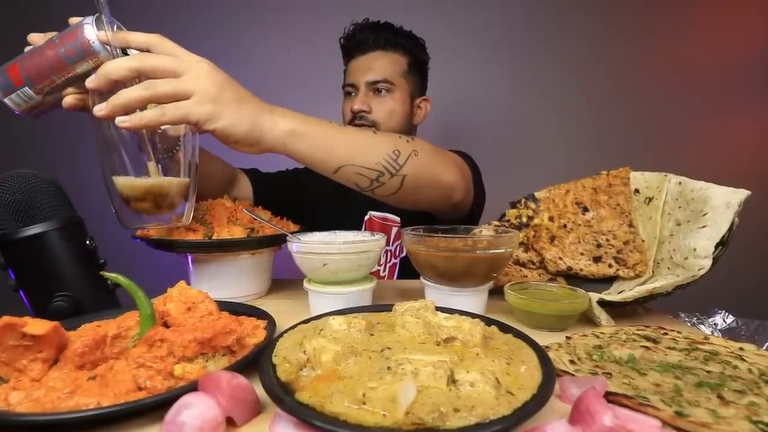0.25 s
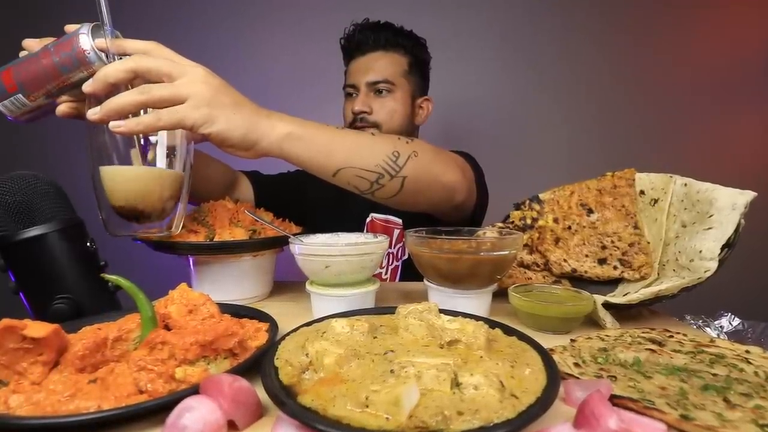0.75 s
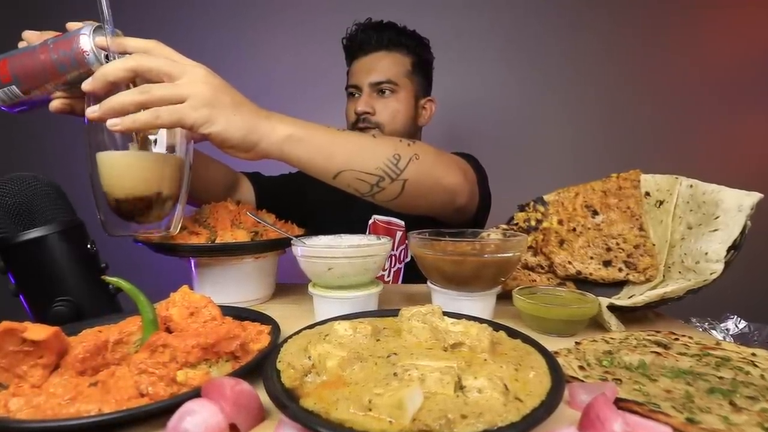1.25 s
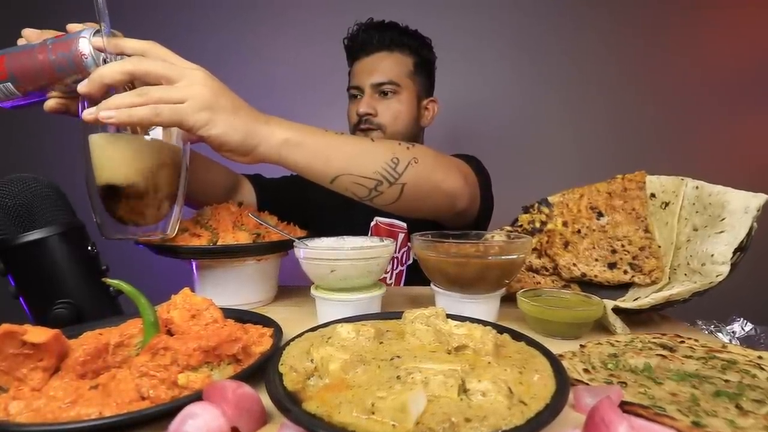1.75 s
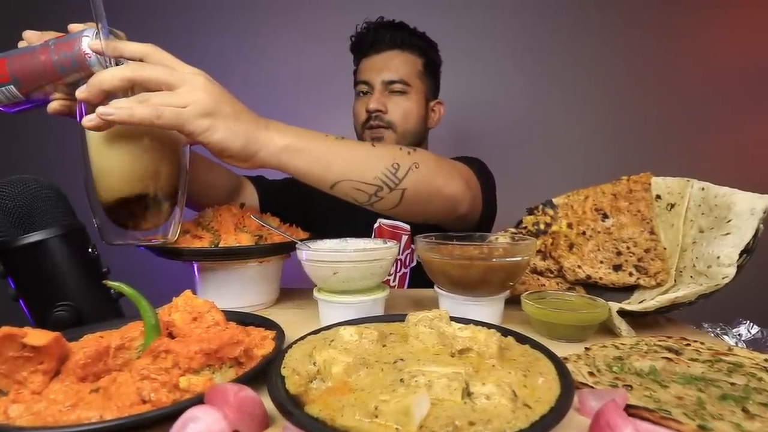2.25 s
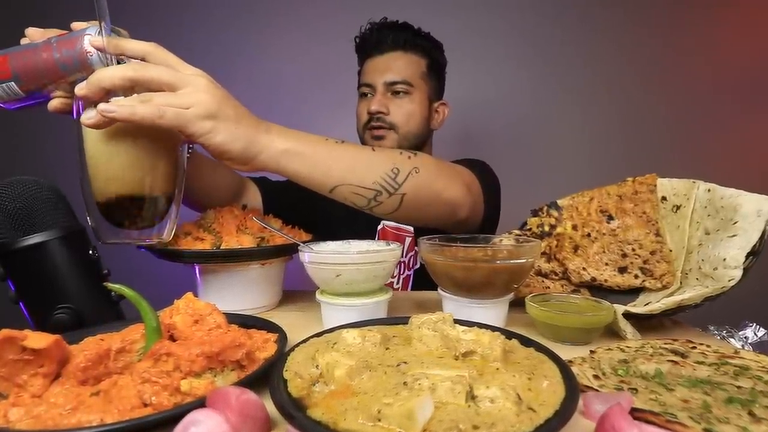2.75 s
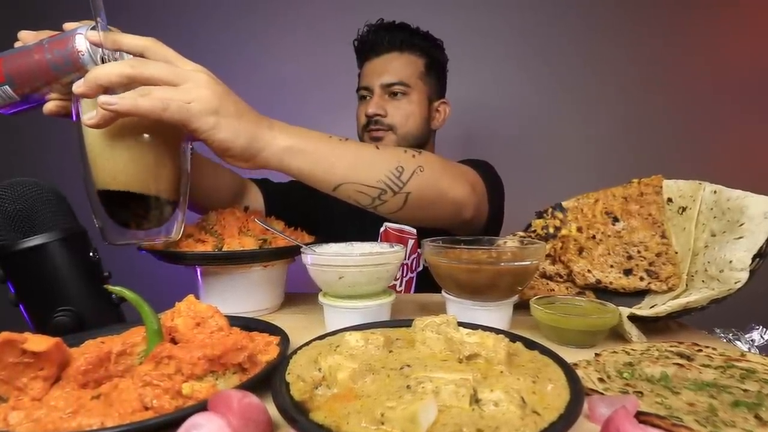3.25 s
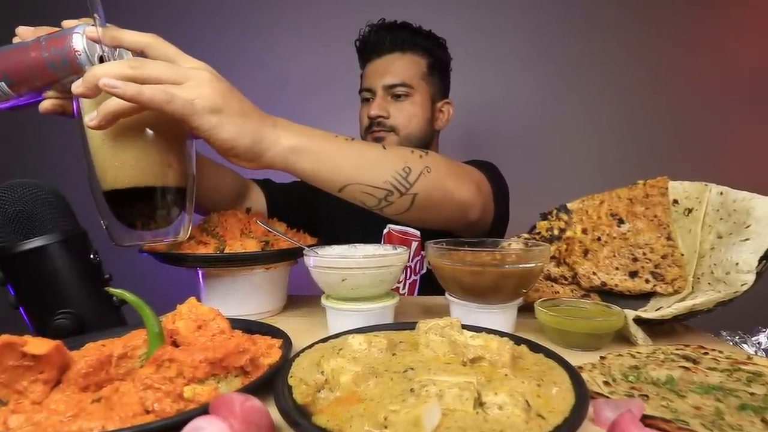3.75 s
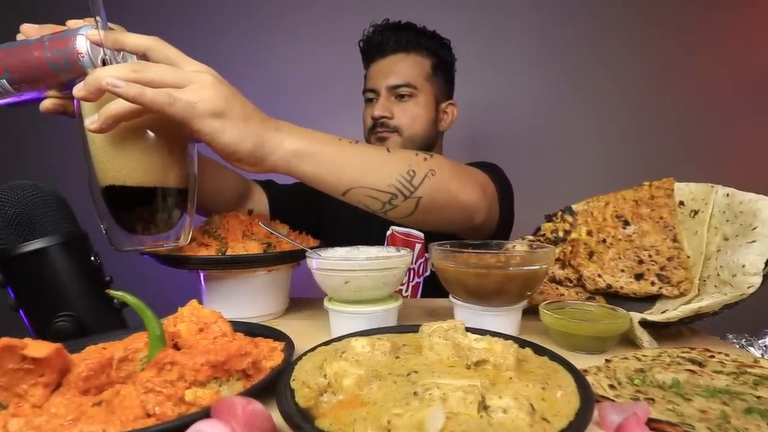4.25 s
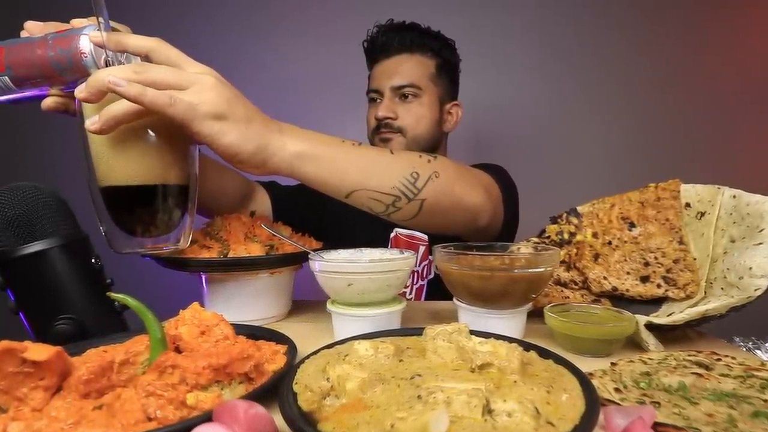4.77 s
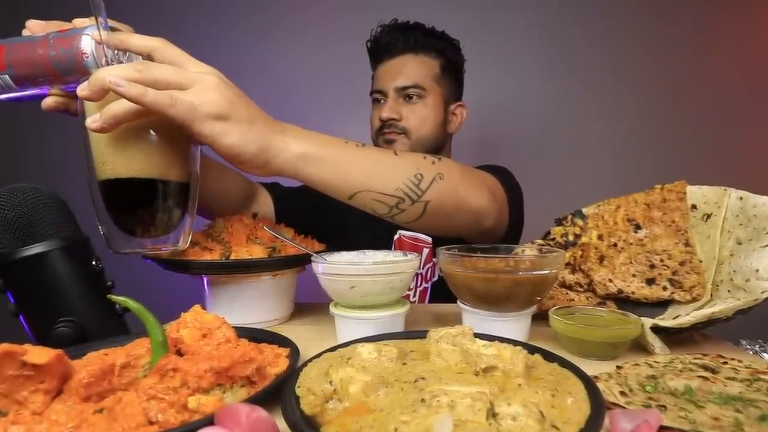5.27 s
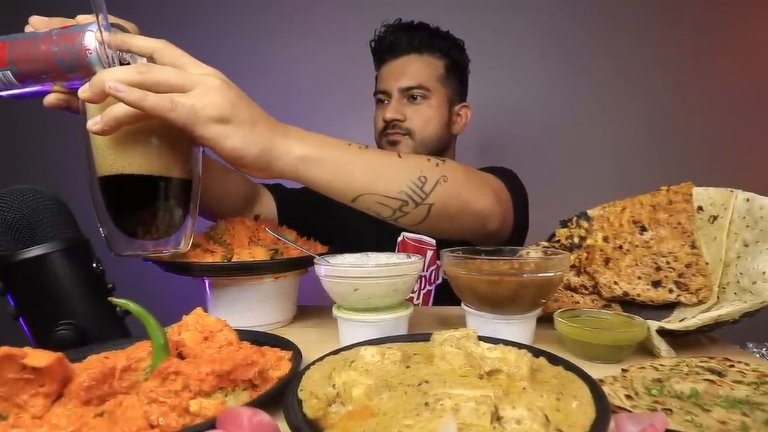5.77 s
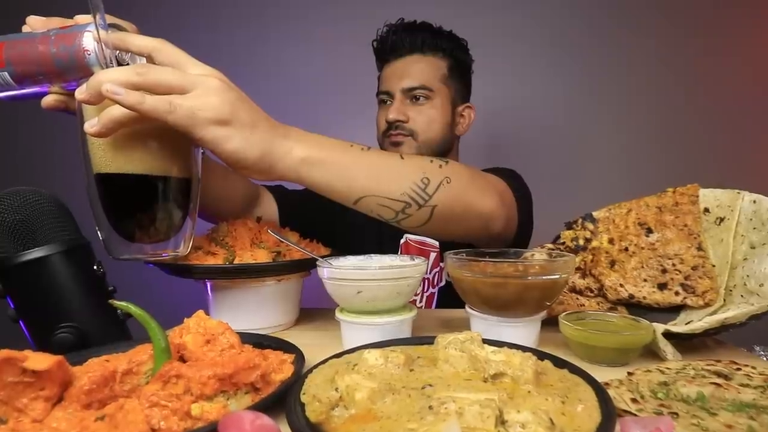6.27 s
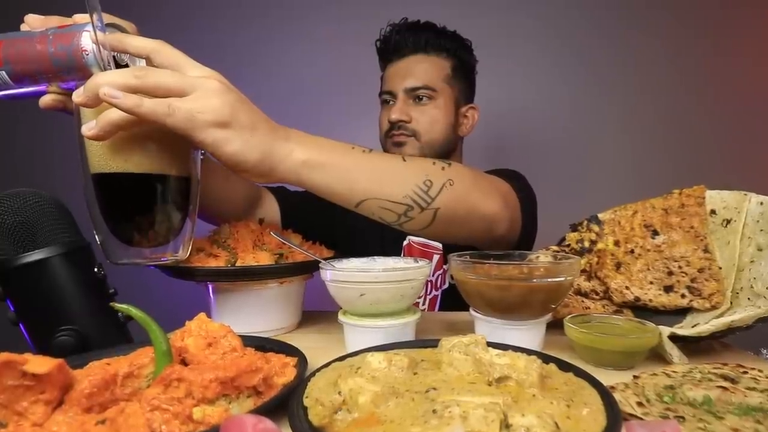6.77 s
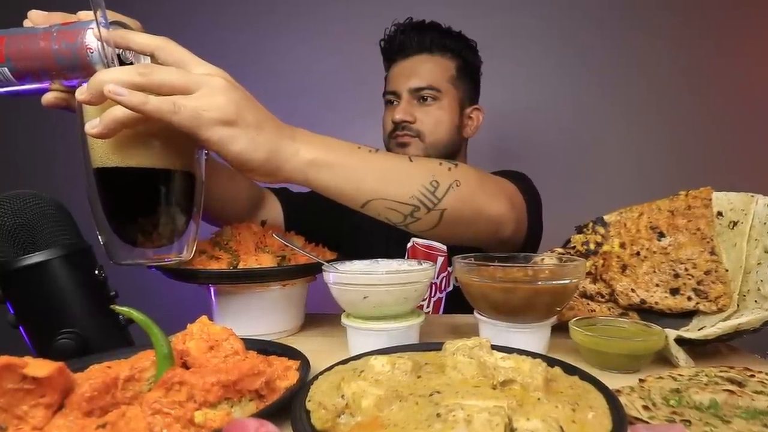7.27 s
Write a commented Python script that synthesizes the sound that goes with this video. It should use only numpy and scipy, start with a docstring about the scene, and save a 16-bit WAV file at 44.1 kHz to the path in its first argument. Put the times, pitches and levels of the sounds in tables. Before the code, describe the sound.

Soda pours from a can into a tall glass, early gurgling splashes and a sharp metallic snap giving way to steady bright fizz.

```python
"""Soda is poured from a can into a tall glass: splashes push air and ring the nearly empty glass.
The can snaps early, its edge then ticks on the rim: struck modes with a brief noisy crack.
Foam, random bubble clicks through filters, hisses throughout; its air column shortens and rises in pitch.
Single bubbles pop as clicks with short rings; a knock sets the microphone stand swinging.
Late on, the can snaps, squeaks on the glass by stick-slip, then ticks on the rim. Room noise hums underneath."""
import sys
import numpy as np
from scipy import signal
from scipy.fft import rfft, irfft, next_fast_len
from scipy.io import wavfile
from scipy.ndimage import uniform_filter1d, map_coordinates

SR = 44100
rng = np.random.default_rng(int(sys.argv[2]) if len(sys.argv) > 2 else 0)


def dump(signal):
    """Clip the signal to [-1, 1] and save it as 16-bit WAV at the path in sys.argv[1]."""
    limited = np.clip(np.atleast_2d(signal).T, -1, 1)
    pcm = np.round(limited * 32767).astype(np.int16)
    wavfile.write(sys.argv[1], SR, pcm)


def gain_from_db(level_db):
    """Turn a decibel level (scalar or array-like) into a linear amplitude factor."""
    decades = np.asarray(level_db, float) / 20
    return 10 ** decades


N = 331781


def unit(x):
    """Scaled to rms 1."""
    return x / np.sqrt(np.mean(x ** 2) + 1e-20)


def along(points, hz):
    """(Hz, value) points read on a log frequency axis."""
    point_hz, value = np.transpose(points)
    return np.interp(np.log(hz + 1), np.log(point_hz + 1), value)


def curves(rows, t):
    """Each column after the time, read at times t."""
    s, *columns = np.transpose(rows)
    return [np.interp(t, s, column) for column in columns]


def wobble(rate_hz):
    """A smooth random curve, rate_hz knots a second."""
    knots = rng.standard_normal(int(N * rate_hz / SR) + 4)
    return map_coordinates(knots, [np.arange(N) * rate_hz / SR])


def filtered(x, response):
    """x times a complex response of frequency."""
    m = next_fast_len(N + 8192)
    return irfft(rfft(x, m) * response(np.fft.rfftfreq(m, 1 / SR)), m)[:N]


def shaped_noise(x, spectrum_db):
    """x filtered to a (Hz, dB) spectrum, at rms 1."""
    return unit(filtered(x, lambda f: gain_from_db(along(spectrum_db, f))))


def peak(hz, centre_hz, width_hz):
    """A causal resonance of top gain 1."""
    return 1j * hz * width_hz / (centre_hz ** 2 - hz ** 2 + 1j * hz * width_hz)


def add(track, s, sound):
    """Mixes a sound into the track from time s."""
    part = track[max(round(s * SR), 0):][:len(sound)]
    part += sound[:len(part)]


def bursts(per_second, spread_db, share):
    """Tiny bubble clicks of uneven size over the blur of countless smaller ones."""
    chance, size = rng.random((2, N))
    strength = gain_from_db(-spread_db * np.log(size + 0.022)) * rng.standard_normal(N)
    clicks = (chance < per_second / SR) * strength
    return np.sqrt(share) * unit(clicks) + np.sqrt(1 - share) * rng.standard_normal(N)


# Foam fizz: time_s, fizz_db
FOAM_LEVEL = [(0, -50.5), (.3, -48.5), (.55, -46), (1.95, -45.5), (2.4, -44.5), (4.2, -42.5), (6.2, -42),
              (7.52, -43)]
# The colour of the full glass takes over: middle, time scale, share before
FULL_AT_S, FULL_OVER_S, FULL_AT_FIRST = 2.84, 0.19, 0.3


def foam():
    """Bursting bubbles fizz through a filling glass and sound the air above them."""
    t = np.arange(N) / SR
    fizz_db, = curves(FOAM_LEVEL, t)
    takeover = 1 / (1 + np.exp((FULL_AT_S - t) / FULL_OVER_S))
    filled = FULL_AT_FIRST + (1 - FULL_AT_FIRST) * takeover
    return glass_fizz(fizz_db, filled) + small_bubbles(t, fizz_db) + air_column(t, fizz_db, filled)


# Fizz out of a deep and a full glass: freq_hz, density_db (per Hz, relative)
DEEP_SPECTRUM = [(200, -44), (400, -16), (1000, 5), (1800, -7.5), (3000, -3.5), (4400, -4), (6000, -1.5),
                 (8000, -2.5), (8800, -6.5), (11000, -28), (16000, -45)]
FULL_SPECTRUM = [(200, -41), (400, -8.5), (1000, -1.5), (2200, -3), (4200, -6), (6000, -4), (7800, -7.5),
                 (8800, -12.5), (11000, -29), (16000, -45)]
# Cross resonances of the deep and the full glass: freq_hz, width_hz, boost_db
DEEP_RESONANCES = [(2390, 110, 9.5), (3520, 180, 1), (5540, 190, 2.5), (6360, 400, 2.5)]
FULL_RESONANCES = [(1037, 100, 3.1), (1911, 55, 7.1), (2340, 140, 4.9), (2640, 530, 3.7), (3470, 650, 1.8),
                   (5440, 170, 2.9), (6730, 1500, 3.1)]


def glass_fizz(fizz_db, filled):
    """The glass colours the fizz; the deep colour crossfades to the full one."""
    def colour(spectrum, resonances):
        def response(f):
            boost_db = sum(db * abs(peak(f, hz, width_hz)) ** 2 for hz, width_hz, db in resonances)
            return gain_from_db(along(spectrum, f) + boost_db)
        return response

    deep = unit(filtered(bursts(2500, 7.3, 0.28), colour(DEEP_SPECTRUM, DEEP_RESONANCES)))
    full = unit(filtered(bursts(2500, 2.2, 0.37), colour(FULL_SPECTRUM, FULL_RESONANCES)))
    mix = np.sqrt(1 - filled) * deep + np.sqrt(filled) * full
    return gain_from_db(fizz_db + 0.52 * wobble(8.3)) * mix


# Small and finest bubbles: freq_hz, density_db (per Hz, relative)
SMALL_SPECTRUM = [(7000, -37), (8500, -1), (9500, 2), (10600, -1), (11500, -9.5), (13000, -28)]
FINEST_SPECTRUM = [(9000, -26), (11500, -1.5), (13200, 2.5), (14500, -0.5), (15700, -3.5)]
# Brightness over the fizz: time_s, small_db, finest_db, sizzle_db (band near 7.5 kHz)
BRIGHTNESS = [(0, -15, -16, -14), (.5, -12.5, -15, -13), (.95, -15.5, -13, -9.5), (1.75, -13, -9.5, -14),
              (2.1, -14.5, -9.5, -6), (2.6, -11, -13.5, -9), (2.95, -15.5, -12.5, -12),
              (3.3, -17, -13.5, -9.5), (4.4, -14.5, -14, -13), (5.6, -14.5, -15, -13),
              (7.52, -17, -16.5, -23)]


def small_bubbles(t, fizz_db):
    """Smaller bubbles add three treble bands, each with its own level curve."""
    small_db, finest_db, sizzle_db = curves(BRIGHTNESS, t)
    finest = shaped_noise(bursts(3000, 2.8, 0.3), FINEST_SPECTRUM)
    small = shaped_noise(bursts(3000, 4.2, 0.48), SMALL_SPECTRUM)
    sizzle = unit(filtered(bursts(3000, 3, 0.39), lambda f: abs(peak(f, 7560, 1600)) ** 2))
    finest = finest * gain_from_db(fizz_db + finest_db + 0.6 * wobble(7))
    small = small * gain_from_db(fizz_db + small_db + 0.6 * wobble(8.8))
    sizzle = sizzle * gain_from_db(fizz_db + sizzle_db + 0.55 * wobble(6))
    return finest + small + sizzle


# Air over the liquid, a quarter-wave tube: time_s, length_m, level_db
AIR_COLUMN = [(0, 0.12, -46), (.35, 0.12, -50.5), (.65, 0.11, -59), (1.1, 0.1, -52.5), (1.9, 0.073, -46),
              (2.3, 0.064, -47), (2.7, 0.061, -44.5), (3.3, 0.062, -48), (5.5, 0.061, -52.5),
              (7.52, 0.06, -50.5)]
SOUND_M_PER_S = 343
# Pitch over width; a sloshing, rising surface widens the resonance by SMEAR_S of its glide
SHARPNESS, SMEAR_S = 5.1, 0.34
# Cross resonance over the fizz: grows as foam covers the bottom, fades as the glass fills
CROSS_DB, CROSS_RISE_S = -4, 0.14
# Higher resonance of the nearly empty glass, over the fizz, fading as it fills
UPPER_DB, UPPER_FADE_S = -11, 1


def air_column(t, fizz_db, filled):
    """Bubble bursts excite a gliding quarter-wave resonance and two fixed ones."""
    hz, frame_s, spectrum = signal.stft(bursts(800, 3.0, 0.13), SR, nperseg=512)
    hz = hz[:, None]
    length_m, column_db = curves(AIR_COLUMN, frame_s)
    pitch_hz = SOUND_M_PER_S / (4 * length_m)
    glide_hz_per_s = uniform_filter1d(np.gradient(pitch_hz, frame_s), size=60)
    width_hz = pitch_hz / SHARPNESS + SMEAR_S * abs(glide_hz_per_s)

    def rms_one(gain):
        return gain / np.sqrt(np.mean(gain ** 2, axis=0))

    tube = gain_from_db(column_db) * rms_one(abs(peak(hz, pitch_hz, width_hz)) ** 1.5)
    covered = 1 - np.exp(-(t + 0.05) / CROSS_RISE_S)
    cross_gain = gain_from_db(fizz_db + CROSS_DB) * (1 - filled) * covered
    cross = np.interp(frame_s, t, cross_gain) * rms_one(abs(peak(hz, 2760, 330)) ** 1.8)
    upper_gain = gain_from_db(fizz_db + UPPER_DB) * np.exp(-t / UPPER_FADE_S)
    upper = np.interp(frame_s, t, upper_gain) * rms_one(abs(peak(hz, 3630, 150)) ** 1.5)
    sound = signal.istft(spectrum * (tube + cross + upper), SR, nperseg=512)[1][:N]
    return sound * gain_from_db(0.28 * wobble(9.3))


# Liquid slaps the bottom or the pool: start_s, push_peak_db, rise_ms (0.01 ms is added)
SPLASH_EVENTS = [(0, -14, 0.25), (.0155, -22, 0.17), (.027, -25, .25), (.0905, -31, 0.15),
                 (.0995, -28, .21), (.1322, -12, 0.32), (.1555, -24, .2), (.159, -23, .2),
                 (.1727, -25, 0.15), (.1878, -19, 0.13), (0.2227, -11, 0.15), (0.2373, -21, .15),
                 (.243, -23, 0.12), (.269, -24, .2), (.286, -20, 0.076), (.327, -26, 0.3),
                 (0.3313, -25.5, 0.17), (.716, -18.5, 0.063), (0.7843, -20, .11), (1.38, -28, 0.4)]
# Column drive on the bare bottom, time for a pool to cushion it, drive left after
RINGING, CUSHION_S, RINGING_LEFT = 6.9, 0.14, 0.84
# Drops too small to count keep the empty column ringing, dying away
TRICKLE_DB, TRICKLE_T60_S = -31, 2


def splashes():
    """A short push of air, heard directly and ringing on in the column of the still empty glass."""
    pushes, column_drive = np.zeros(N), np.zeros(N)
    t_ms = np.arange(400) * 1000 / SR
    for start_s, peak_db, rise_ms in SPLASH_EVENTS:
        u = t_ms / (rise_ms + 0.01)
        push = gain_from_db(peak_db) * u * np.exp(1 - u)
        add(pushes, start_s, push)
        add(column_drive, start_s, (RINGING_LEFT + RINGING * np.exp(-start_s / CUSHION_S)) * push)
    trickle_db = TRICKLE_DB - 60 * np.arange(N) / SR / TRICKLE_T60_S + 3 * wobble(40)
    column_drive += gain_from_db(trickle_db) * rng.standard_normal(N)

    def slap(f):
        low = 0.98 * peak(f, 573, 196) + 0.46 * peak(f, 340, 140)
        return low + 0.55 * peak(f, 1900, 1700) + 0.43 * peak(f, 2800, 400)

    return filtered(pushes, slap) + filtered(column_drive, lambda f: peak(f, 729, 56))


# Single big bubbles: start_s, ring_db, start_pitch_hz, t60_s, click_db
POP_EVENTS = [(1.635, -29, 7160, .005, -38), (2.325, -22, 2150, 0.0068, -18), (2.327, -32, 2200, .004, -26),
              (2.674, -27, 1840, .006, -38), (2.818, -27, 1800, 0.0085, -38),
              (6.907, -19.5, 6370, 0.02, -37)]


def pops():
    """A bursting bubble: a click and a short ring that rises a little."""
    y, t = np.zeros(N), np.arange(1500) / SR
    # The film tears in one push and pull
    click = np.diff(np.exp(-((t - 0.0001) / 0.000036) ** 2), append=0)
    for start_s, ring_db, pitch_hz, t60_s, click_db in POP_EVENTS:
        tone = np.sin(2 * np.pi * pitch_hz * t * (1 + 3 * t))
        add(y, start_s, gain_from_db(ring_db - 60 * t / t60_s) * tone)
        add(y, start_s, -gain_from_db(click_db) * click / click.max())
    return y


# Can wall snaps: start_s, peak_db, chatter_s, free_s (rings freely until fingers damp it)
SNAP_EVENTS = [(0.4216, -3.5, .001, .006), (0.4286, 2, .001, .0135), (5.1355, -30, .006, .002),
               (5.1565, -24.5, 0.016, 0)]
# Modes of the can wall, damped: freq_hz, level_db, t60_s
CAN_MODES = [(310, -13, .025), (1050, -9, .022), (1184, -13, .02), (1650, -20, .015), (2412, -22, .05),
             (2900, -21, .015), (3400, -19, .015), (3920, -4, .03), (4053, -7, .025), (4200, -5, .025),
             (4335, -5, .028), (4560, -1, .028), (4690, -8, .025), (4815, -8, .028), (5093, -12, .035),
             (5280, -13, .025), (5525, -4, .022), (5706, 2, .022), (5995, -4, .022), (6120, -12, .02),
             (7150, -14, .04), (7876, -19, .03), (8515, -13, .03), (9905, -17, .035), (10190, -21, .035),
             (14350, -21, .02)]
# Thin tones of the glass lingering after the loudest snap: freq_hz, level_db, t60_s
GLASS_MODES = [(3935, -10, .35), (4323, -6, .2), (4490, 0, .19), (4813, -9, .35), (5060, -6, .3),
               (5157, -11, .4), (5701, -8, .25)]
GLASS_START_S, GLASS_PEAK_DB = 0.432, -22.5
# Can on the rim: start_s, peak_db, chatter_s, free_s, lowpass_hz (softer contacts are duller)
TICK_EVENTS = [(.7677, -15.5, .001, .004, 4300), (0.7712, -17, .001, .002, 15000),
               (5.2895, -26, .002, 0, 2200), (5.2935, -31, .001, 0, 2200)]
# Modes of can on rim, damped: freq_hz, level_db, t60_s
RIM_MODES = [(1010, -13, 0.018), (1700, -3, 0.018), (1890, -1, .01), (2370, -14, 0.03), (3240, -17, 0.012),
             (3700, -13, .035), (4190, -3, 0.012), (5230, -10, 0.02), (5490, -2, .02), (5800, -8, 0.04),
             (6040, -6, .02), (7190, -22, .03), (10000, -26, .025), (13100, -28, .025)]


def can():
    """The wall of the can snaps and sets the glass ringing; its edge ticks on the rim."""
    glass = np.zeros(N)
    add(glass, GLASS_START_S, gain_from_db(GLASS_PEAK_DB) * ring(GLASS_MODES, 1.5, 0.3, 0.002))
    return glass + rattles(SNAP_EVENTS, CAN_MODES, -15) + rattles(TICK_EVENTS, RIM_MODES, -8)


def rattles(events, modes, crack_db):
    """Each contact is one impulse and a smaller chatter, through the modes and a dense brief crack."""
    y, t = np.zeros(N), np.arange(1800) / SR
    for start_s, peak_db, chatter_s, free_s, *lowpass_hz in events:
        hits = rng.random(len(t)) < 0.08
        chatter = 0.14 * (t < chatter_s) * rng.standard_normal(len(t)) * hits
        chatter[0] = 1
        body = ring(modes, 1.5, 0.15, 0.0002, free_s)
        crack = uniform_filter1d(rng.standard_normal(len(t)), size=3)
        crack = crack - uniform_filter1d(crack, size=60)  # a small object gives no bass
        crack = crack * gain_from_db(crack_db - 60 * damped(t, free_s) / 0.023)
        add(body, 0, (1 - np.exp(-t / 0.00017)) * crack)
        sound = signal.fftconvolve(chatter, body)
        if lowpass_hz:
            sound = signal.sosfilt(signal.butter(4, lowpass_hz[0], fs=SR, output="sos"), sound)
        add(y, start_s, gain_from_db(peak_db) * sound / np.abs(sound).max())
    return y


def ring(modes, scatter_db, length_s, attack_s, free_s=0):
    """Decaying modes at slightly random strengths, neighbours in opposite phase, peak 1."""
    t = np.arange(round(length_s * SR)) / SR
    y = np.zeros(len(t))
    for k, (hz, db, t60_s) in enumerate(modes):
        level_db = db + rng.normal(0, scatter_db) - 60 * damped(t, free_s) / t60_s
        y += (-1) ** k * gain_from_db(level_db) * np.sin(2 * np.pi * hz * t)
    y = y * (1 - np.exp(-t / attack_s))
    return y / np.abs(y).max()


FREE_STRETCH = 7  # an undamped wall rings this many times longer


def damped(t, free_s):
    """Time as decay counts it: slowly while the wall rings freely."""
    return np.minimum(t, free_s) / FREE_STRETCH + np.maximum(t - free_s, 0)


# Stick-slip of metal on glass: time_s, slip_hz, level_db (rms of the fundamental)
SQUEAK_PATH = [(5.131, 1032, -55), (5.1335, 1042, -33), (5.144, 1085, -46), (5.152, 1082, -32.5),
               (5.157, 763, -40.5), (5.169, 785, -40), (5.174, 992, -36.5), (5.194, 991, -37),
               (5.199, 962, -39.5), (5.23, 962, -39.5), (5.266, 980, -38.5), (5.278, 975, -39),
               (5.287, 990, -37.5), (5.293, 1020, -35), (5.298, 1050, -60)]
# What can and glass pass on of each overtone: freq_hz, gain_db
BODY_GAIN = [(1600, -6), (1930, 2.5), (2100, 0), (2400, -15), (2900, -12.5), (3150, -18), (3900, -11),
             (4600, -13), (4850, -22), (5400, -17), (5900, -32), (9000, -42)]
# Slips slower than this are harder: each overtone gains more than the last
STEADY_HZ, HARSH_DB_PER_HZ = 940, 0.02
RASP_DB = -13  # a puff of scraping noise with each slip
GRIP_S, LOOSE_DB = 5.196, -7  # the edge grips the rim here; before that the octave is weaker


def squeak():
    """Slips at an unsteady rate, each overtone coloured by the body; the upper ones are rougher."""
    t = np.arange(N) / SR
    slip_hz, level_db = curves(SQUEAK_PATH, t)
    phase = 2 * np.pi * np.cumsum(slip_hz * (1 + 0.009 * wobble(300))) / SR
    harsh_db = HARSH_DB_PER_HZ * np.maximum(STEADY_HZ - slip_hz, 0)
    fundamental = gain_from_db(0.9 * wobble(150)) * np.sin(phase)
    octave_db = along(BODY_GAIN, 2 * slip_hz) + LOOSE_DB * (t < GRIP_S) + 1.7 * wobble(150)
    octave = gain_from_db(octave_db) * np.sin(2 * phase + 1)
    upper = np.zeros(N)
    for k in range(3, 12):
        overtone_db = along(BODY_GAIN, k * slip_hz) + k * harsh_db + 2.7 * wobble(200)
        upper += gain_from_db(overtone_db) * np.sin(k * phase + 0.4 * wobble(250))
    scrape = unit(filtered(rng.standard_normal(N), lambda f: peak(f, 4000, 4600) ** 2))
    rasp = gain_from_db(RASP_DB + 4 * harsh_db) * (1 + np.cos(phase)) * scrape
    sounding = (t > SQUEAK_PATH[0][0]) * (t < SQUEAK_PATH[-1][0])
    return np.sqrt(2) * gain_from_db(level_db) * (fundamental + octave + upper + rasp) * sounding


KNOCK_S, TAP_DB, SWING_DB = 2.4408, -19, -29
# Modes of the microphone stand: freq_hz, level_db, t60_s
STAND_MODES = [(28.6, 0, 1.7), (118, -12, 0.3), (71, -5, 0.33)]


def knock():
    """A dull tap, then the stand swings slowly and dies away."""
    y, t = np.zeros(N), np.arange(1200) / SR
    push = -np.exp(-((t - 0.0005) / 0.00016) ** 2)
    push = push - uniform_filter1d(push, size=400)  # a lean tap, little bass
    tone = 0.5 * gain_from_db(-60 * t / 0.014) * np.sin(2 * np.pi * 1750 * t) * (t > 0.0007)
    add(y, KNOCK_S, gain_from_db(TAP_DB) * (push + tone))
    add(y, KNOCK_S + 0.001, gain_from_db(SWING_DB) * ring(STAND_MODES, 0, 2, 0.02))
    return y


def walls(x):
    """A short answer from table and walls: decaying noise of unit energy as impulse response."""
    t = np.arange(SR // 3) / SR
    tail = rng.standard_normal(len(t)) * gain_from_db(-60 * t / 0.29) * (t > 0.004)
    return signal.fftconvolve(x, tail / np.linalg.norm(tail))[:N]


# Hum of the room: freq_hz, density_db (per Hz, relative)
ROOM_SPECTRUM = [(32, -35), (55, -18.5), (91, 1.5), (118, -5.5), (189, -3), (271, -8.5), (336, -9),
                 (678, -9), (700, -7), (910, -42), (1540, -120)]
# Room levels: time_s, hum_db, rumble_db (deepest rumble)
ROOM_LEVEL = [(0, -53.5, -56.5), (2, -55.5, -57.5), (3.6, -55, -56.5), (5.7, -54.5, -61),
              (7.52, -50, -57.5)]


def room():
    """Low hum and rumble of the building, filtered noise swelling slowly."""
    hum_db, rumble_db = curves(ROOM_LEVEL, np.arange(N) / SR)
    hum = shaped_noise(rng.standard_normal(N), ROOM_SPECTRUM)
    rumble = unit(filtered(rng.standard_normal(N), lambda f: abs(peak(f, 35.6, 33)) ** 2))
    return gain_from_db(hum_db + 1.8 * wobble(3.15)) * hum + gain_from_db(rumble_db + 1.8 * wobble(1.45)) * rumble


def scene():
    """All sources at one microphone; the hits also answer from the walls."""
    hits = splashes() + pops() + can() + squeak()
    wet = gain_from_db(-23) * walls(hits)
    return (hits + wet + foam() + knock() + room())[None]


def band_limit(x):
    """A steep low-pass at the top of the band."""
    return signal.sosfilt(signal.butter(12, 15880, fs=SR, output="sos"), x)


def record(dry):
    """Clips the mix at full scale."""
    mix = np.clip(dry, -1, 1)
    return band_limit(mix)


dry = scene()
out = record(dry)
dump(out)
```